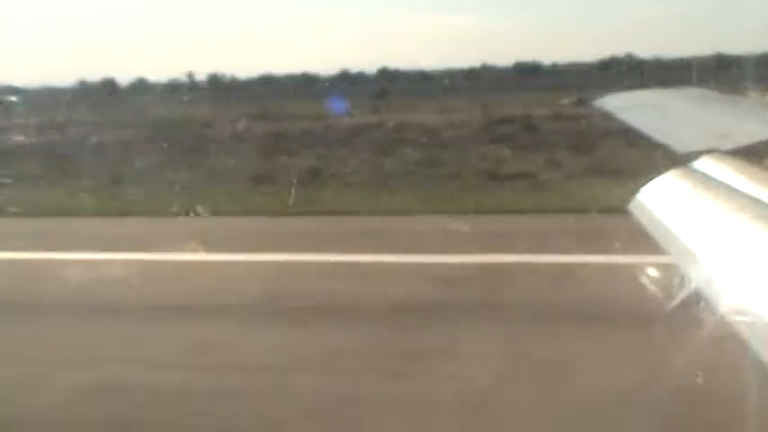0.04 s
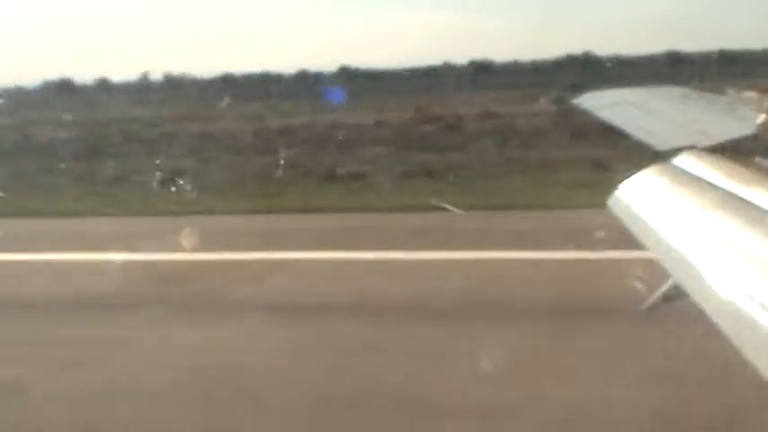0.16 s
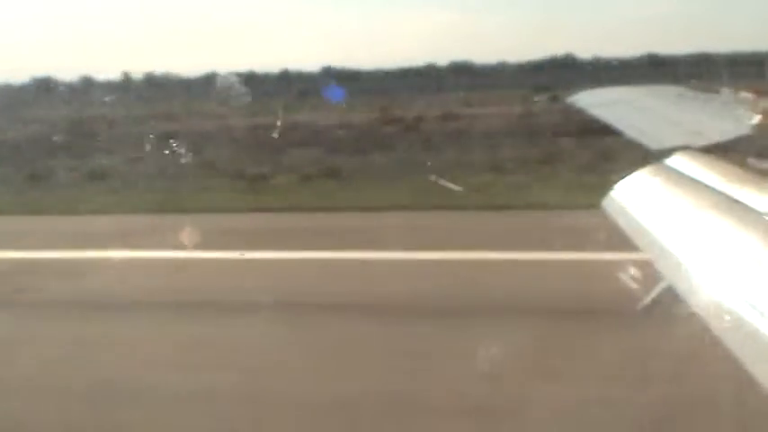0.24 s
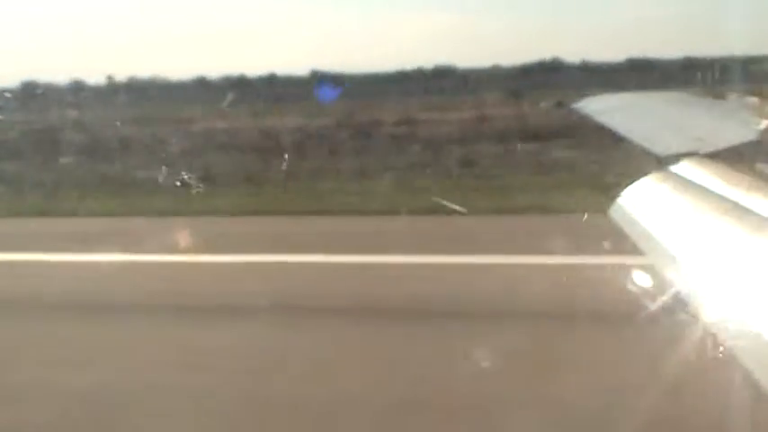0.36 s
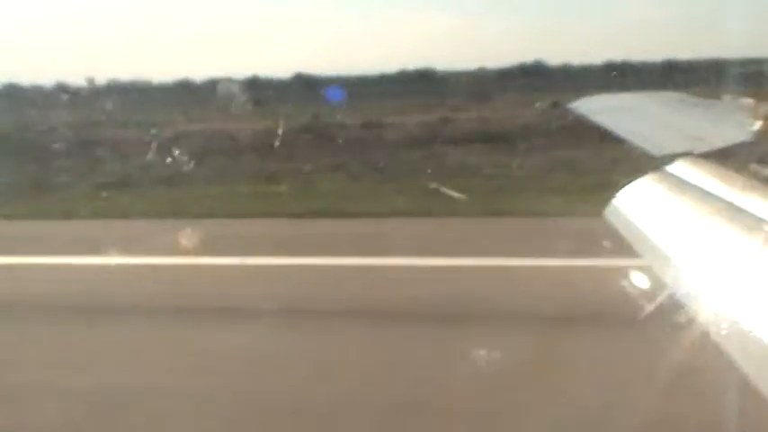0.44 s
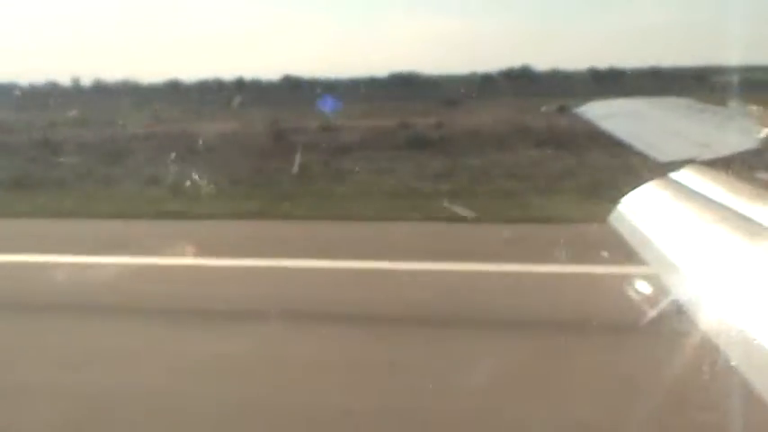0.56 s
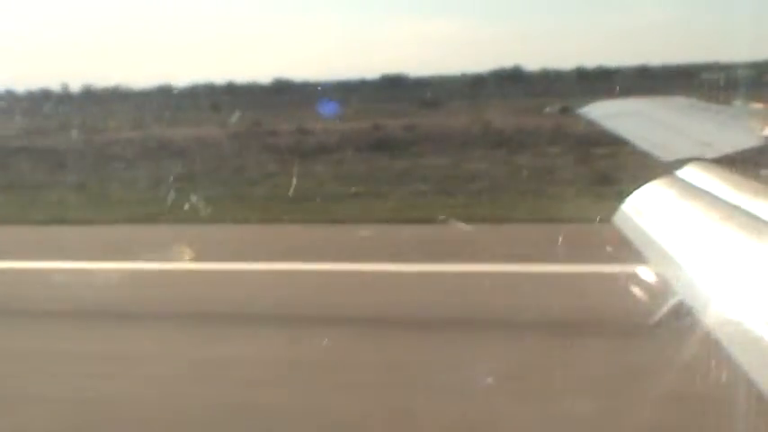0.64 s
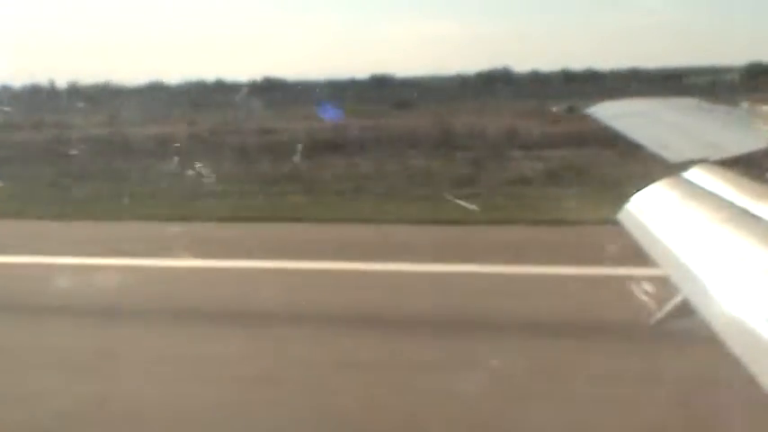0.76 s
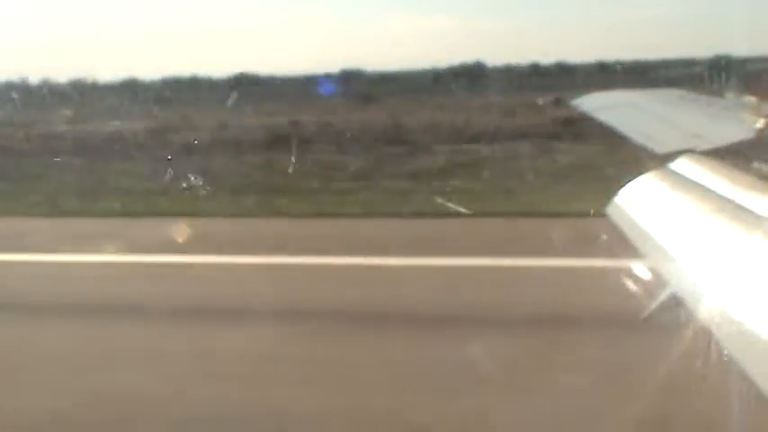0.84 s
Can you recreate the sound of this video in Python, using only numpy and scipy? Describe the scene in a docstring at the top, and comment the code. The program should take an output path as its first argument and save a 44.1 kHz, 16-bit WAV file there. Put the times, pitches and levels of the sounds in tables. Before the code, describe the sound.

Inside a jet cabin, a continuous booming roar clips a stereo microphone from the start; quick wheel bumps, small trim rattles and dry ticks dot it under steady hiss, and the roar slackens in the last second.

```python
"""Inside a small jet on the runway

A low roar booms in the cabin of a small jet rolling fast, and loose trim rattles faintly.
The roar is shaped random noise that overloads the three capsules of a microphone. Their clipped
signals are subtracted and smoothed into left and right. Noise bursts make the rumble at the runway
joints, the rattles and the dry ticks; a flickering hiss lies over it all."""
import sys
import numpy as np
from scipy import signal
from scipy.fft import rfft, irfft
from scipy.io import wavfile
from scipy.ndimage import uniform_filter1d

SR = 44100
rng = np.random.default_rng(int(sys.argv[2]) if len(sys.argv) > 2 else 0)


def to_wav(sig):
    """Store sig (one row per channel, or 1-D mono) as 16-bit WAV at the path in sys.argv[1].

    Samples outside -1..1 are clipped; the rate is SR.
    """
    pcm = np.clip(np.atleast_2d(sig), -1, 1) * 32767
    pcm = np.round(pcm).astype(np.int16)
    wavfile.write(sys.argv[1], SR, pcm.T)  # frames by channels


def elevation(decibels):
    """Turn decibel levels (scalar or array-like) into linear amplitude ratios."""
    levels = np.asarray(decibels, float)
    return 10 ** (levels / 20)


N = 144648  # length in samples

# Tone colour of the hiss; only the differences between levels count: pitch_hz, level_db (per Hz)
HISS_SPECTRUM = [(880, -39), (1500, -5), (2540, -13), (4940, -17), (11800, -39.5), (14600, -39.5),
                 (15500, -55)]
# How the hiss rises and falls, on top of its overall level: time_s, level_db
HISS_LEVEL = [(.05, -2.5), (.5, -5.5), (.8, -1), (1.5, 0), (2.2, -0.5), (2.65, 0), (2.9, -1), (3.2, -0.5),
              (3.28, -4)]
# Thin dry ticks: start_s, level_db (before TICK_DB), left_over_right_db
TICKS = [(0.2503, -40.5, -1.5), (0.5104, -41, 7), (0.623, -41.5, 0), (0.9913, -37, -10.5),
         (1.6564, -42, -1), (2.12, -56.5, 5.5), (2.206, -41.5, -2), (2.57, -44.5, -17.5), (2.656, -46, -4),
         (2.747, -52, 0.5)]
# Ringing rattles of the trim: start_s, level_db (before RATTLE_DB), pitch_hz
RATTLES = [(0.215, -29, 3730), (0.4003, -34, 3500), (0.5205, -31.5, 3260), (1.931, -38, 4540),
           (2.394, -34, 4400), (2.7, -41, 6960), (3.032, -39, 3350), (3.082, -39, 3350),
           (3.202, -40.5, 3220)]
# Surges as the wheels cross joints in the runway: middle_s, surge_db, half_length_s
JOLTS = [(0.215, 3, .015), (0.407, 5.5, .012), (0.436, 3.5, 0.0073), (0.519, 4, 0.012), (0.636, 4.5, 0.02),
         (0.976, 2.5, 0.018), (1.299, 1.5, 0.01), (1.382, 3.5, 0.0081), (1.676, 1.5, .012),
         (2.05, 0, 0.0098), (2.27, 4.5, .012), (2.289, 3, .008), (2.41, 2, 0.015), (2.677, 4.5, 0.012),
         (3.207, 2.5, .02)]
# Broad roar of engines, tyres and airframe; only differences count: pitch_hz, level_db (per Hz)
ROAR_SPECTRUM = [(20, -45.5), (50, -16), (85, -6.5), (150, -7.5), (260, -8), (400, -17), (700, -42),
                 (900, -33.5), (1500, -41.5), (3000, -46), (4800, -45), (8000, -54), (16000, -76.5)]
# Cabin booms on top of the roar: pitch_hz, width_hz, boost_db
CABIN_BOOMS = [(84, 9.1, 2.5), (168.5, 10, 4.5), (220.86, 20.8, 9), (312, 24.8, 6.5), (318, 33.7, 5.5),
               (860, 32, 7.5)]
# How far the roar drives past the overload point, and its treble: time_s, drive_db, treble_db
ROAR_DRIVE = [(.05, 15.5, 0), (.3, 16.5, -0.5), (.6, 15.5, -0.5), (.9, 13, 0), (1.2, 12, 0),
              (1.499, 13, -3), (1.8, 12.5, -0.5), (2.1, 12.5, -0.5), (2.4, 11, 0), (2.66, 9.5, 0.5),
              (2.75, 8.5, 0.5), (3.0, 4.5, 1.5), (3.14, 4.5, 0), (3.24, 3.5, 1.5), (3.28, 0.5, 4)]
# Likeness of the sound at front and rear capsule: pitch_hz, likeness (0 to 1)
REAR_LIKENESS = [(60, 1), (250, 0.91), (450, 0.7), (1000, 0), (4000, 0), (12000, 0.1)]
# Likeness of the sound at front and side capsule: pitch_hz, likeness (0 to 1)
SIDE_LIKENESS = [(60, 1), (250, 0.94), (450, 0.55), (1000, 0.4), (4000, .6), (12000, .6)]


def evened(x):
    """Scales a sound to an rms of 1."""
    return x / np.sqrt(np.mean(x ** 2) + 1e-20)


def read(points, hz):
    """Reads a table over pitch, with pitch spaced as the ear hears it (logarithmically)."""
    table_hz, value = np.transpose(points)
    return np.interp(np.log(hz + 1), np.log(table_hz + 1), value)


def add(mix, start_s, sound):
    """Mixes a sound in at its start time."""
    part = mix[..., round(start_s * SR):][..., :sound.shape[-1]]
    part += sound[..., :part.shape[-1]]


def low(x, hz):
    """Softens the treble with a gentle one-pole low-pass."""
    r = np.exp(-2 * np.pi * hz / SR)
    return signal.lfilter([1 - r], [1, -r], x)


def filtered(x, order, hz, kind):
    """Passes a sound through a Butterworth filter."""
    return signal.sosfilt(signal.butter(order, hz, kind, fs=SR, output="sos"), x)


def jolts():
    """Short bell-shaped surges in dB as the wheels cross joints in the runway."""
    t = np.arange(N) / SR
    return sum(db * np.exp(-((t - s) / length) ** 2) for s, db, length in JOLTS)


def hiss():
    """Flickering stereo noise, added after the overload so that the clipping does not chop it up."""
    HISS_DB, LEFT_DB, LIKENESS = -47.5, -7, 0.76
    FLICKER_HZ, FLICKER_DB = [50, 350], 3.5
    JOLT_SHARE = 0.17  # share of each surge that reaches the hiss
    a, b = rng.standard_normal((2, N))
    right = LIKENESS * a + np.sqrt(1 - LIKENESS ** 2) * b
    pair = np.array([a * elevation(LEFT_DB), right])
    colour = elevation(read(HISS_SPECTRUM, np.fft.rfftfreq(N, 1 / SR)))
    pair = evened(irfft(rfft(pair) * colour, N))
    wobble = low(rng.standard_normal(N), FLICKER_HZ[1])
    flicker = evened(filtered(wobble, 1, FLICKER_HZ, "band"))
    level_db = np.interp(np.arange(N) / SR, *np.transpose(HISS_LEVEL))
    return pair * elevation(HISS_DB + level_db + JOLT_SHARE * jolts() + FLICKER_DB * flicker)


def ticks():
    """Tiny bright crackles: fast-fading noise with its lower pitches removed, some to one side."""
    TICK_HZ, TICK_DB, FADE_60DB_S = 11500, 3, .002
    out, t = np.zeros((2, N)), np.arange(600) / SR
    for start_s, db, pan_db in TICKS:
        noise = rng.choice([-1., 1.], 600) * elevation(-60 * t / FADE_60DB_S)
        burst = filtered(noise, 2, TICK_HZ, "high")
        pan = np.array([[pan_db / 2], [-pan_db / 2]])
        add(out, start_s, burst / np.abs(burst).max() * elevation(db + TICK_DB + pan))
    return out


def rattles():
    """Short fuzzy rings of loose trim: fading narrow noise around one pitch."""
    SPREAD = 0.12  # half-width of the noise band as a share of the pitch
    RATTLE_DB, RISE_S, FADE_60DB_S = -5, 0.0024, .035
    out, t = np.zeros((2, N)), np.arange(2000) / SR
    for start_s, db, hz in RATTLES:
        band_hz = [hz * (1 - SPREAD), hz * (1 + SPREAD)]
        noise = filtered(rng.standard_normal(4000), 2, band_hz, "band")
        ring = evened(noise[2000:])  # skips the filter's start-up
        envelope = np.minimum(t / RISE_S, 1) * elevation(db + RATTLE_DB - 60 * t / FADE_60DB_S)
        add(out, start_s, envelope * ring[None])
    return out


def rumble():
    """Each jolt shakes the floor: a short rough noise burst in the middle range."""
    RUMBLE_HZ, RUMBLE_DB, SIDE = [815, 1700], -27.5, .4
    a, b = filtered(rng.standard_normal((2, N)), 1, RUMBLE_HZ, "band")
    pair = evened(low(np.array([a + SIDE * b, a - SIDE * b]), RUMBLE_HZ[1]))
    return pair * elevation(RUMBLE_DB) * (elevation(jolts()) - 1)  # silent between jolts


def capsule_noise():
    """Random spectra with booms and patches, partly alike at the front, rear and side capsule."""
    REAR_LEAD_S, REAR_DB = 0.00062, -4.5
    SIDE_LEAD_S, SIDE_DB = .00005, 0.2
    PATCH_DB = 2
    frames, hz = N // 512 + 5, np.fft.rfftfreq(2048, 1 / SR)
    a, b, c, d, e, g, patches = rng.standard_normal((frames, 1025, 7)).T
    # Patches of louder and softer sound, smoothed over pitch and then over time
    patches = uniform_filter1d(patches, size=12, axis=0)
    patches = evened(uniform_filter1d(patches, size=6, axis=1))
    booms_db = sum(db / (1 + (2 * (hz - f) / width) ** 2) for f, width, db in CABIN_BOOMS)
    shape_db = read(ROAR_SPECTRUM, hz) + booms_db
    front = a + 1j * b
    spectra = [front]
    for likeness, own, lead_s, db in ((REAR_LIKENESS, c + 1j * d, REAR_LEAD_S, REAR_DB),
                                      (SIDE_LIKENESS, e + 1j * g, SIDE_LEAD_S, SIDE_DB)):
        same = read(likeness, hz)[:, None]
        mixed = same * front + np.sqrt(1 - same ** 2) * own
        earlier = np.exp(2j * np.pi * hz * lead_s)[:, None]  # a phase turn moves the sound ahead
        spectra.append(mixed * elevation(db) * earlier)
    spectra = np.array(spectra) * elevation(shape_db[:, None] + PATCH_DB * patches)
    return evened(signal.istft(spectra, nperseg=2048, noverlap=1536)[1][:, :N])


def roar():
    """The roar at each capsule: its treble flickers, its bass grows and jolts make it surge."""
    TREBLE_HZ, FLICKER_HZ, FLICKER_DB = 473, 34.0, 1
    BASS_HZ, BASS_GAIN_DB_PER_S = 109, 1.7
    SWELL_HZ, SWELL_DB = 22.0, .5
    JOLT_SHARE = 0.28  # share of each surge that reaches the overload
    x = capsule_noise()
    t, (s, drive_db, treble_db) = np.arange(N) / SR, np.transpose(ROAR_DRIVE)
    swell = evened(low(low(rng.standard_normal(N), SWELL_HZ), SWELL_HZ))
    flicker = evened(low(low(rng.standard_normal(N), FLICKER_HZ), FLICKER_HZ))
    treble = filtered(x, 2, TREBLE_HZ, "high")
    x = x + (elevation(np.interp(t, s, treble_db) + FLICKER_DB * flicker) - 1) * treble
    bass = low(low(x, BASS_HZ), BASS_HZ)
    # The bass grows as the aircraft slows
    x = x + (elevation(BASS_GAIN_DB_PER_S * (t - t[-1] / 2)) - 1) * bass
    return x * elevation(np.interp(t, s, drive_db) + JOLT_SHARE * jolts() + SWELL_DB * swell)


def microphone(front, rear, side):
    """All capsules clip; rear is taken from front, side widens the image, and all is smoothed."""
    REAR_LEFT, REAR_RIGHT, LEFT_DB = 0.56, .52, 0.43
    WIDTH, WIDTH_HZ, WIDTH_TOP_HZ = 0.46, 195, 7000
    SMOOTH_HZ, AIR_DB, LOW_CUT_HZ, OUT_DB = 395, -19, 65, -12
    front, rear, side = (np.clip(v, -1, 1) for v in (front, rear, side))
    edges = WIDTH * low(side - low(side, WIDTH_HZ), WIDTH_TOP_HZ)
    left = (front - REAR_LEFT * rear - edges) * elevation(LEFT_DB)
    right = front - REAR_RIGHT * rear + edges
    pair = np.array([left, right])
    pair = low(pair, SMOOTH_HZ) + elevation(AIR_DB) * pair  # a little unsmoothed sound stays in
    return elevation(OUT_DB) * filtered(pair, 2, LOW_CUT_HZ, "high")


def scene():
    """Overloaded roar with hiss, rattles, ticks and rumble over it."""
    return microphone(*roar()) + hiss() + rattles() + ticks() + rumble()


def band_limit(x):
    """A steep low-pass at the top of the band."""
    return signal.sosfilt(signal.butter(12, 15730, fs=SR, output="sos"), x)


def record(dry):
    """Starts with a brief silence and fades the mix smoothly in and out."""
    START_S, FADE_S, END_FADE_S = 0.039, 0.024, 0.0027
    t = np.arange(N) / SR
    ramp = np.minimum((t - START_S) / FADE_S, (N / SR - t) / END_FADE_S)
    fade = np.sin(np.pi / 2 * np.clip(ramp, 0, 1)) ** 2
    return band_limit(dry * fade)


dry = scene()
out = record(dry)
to_wav(out)
```